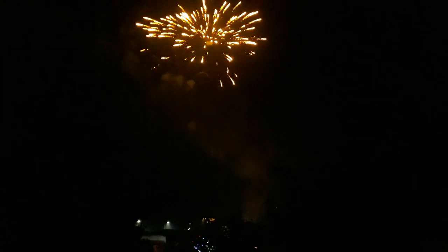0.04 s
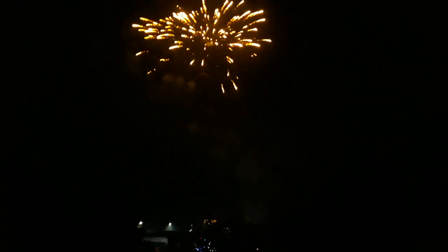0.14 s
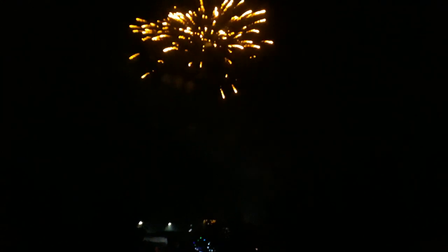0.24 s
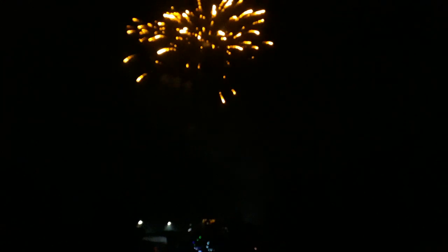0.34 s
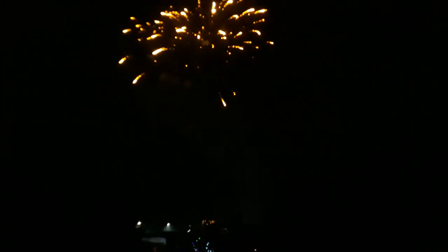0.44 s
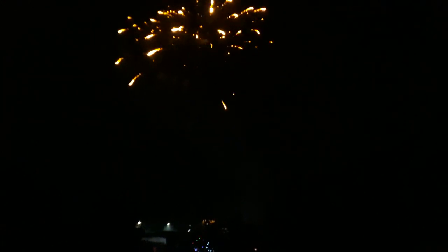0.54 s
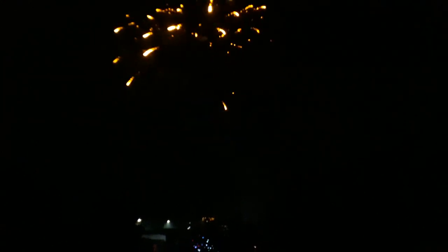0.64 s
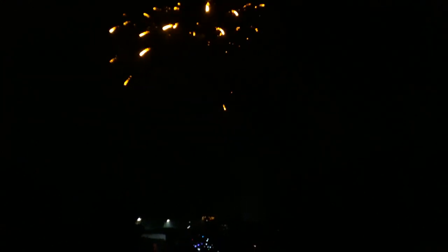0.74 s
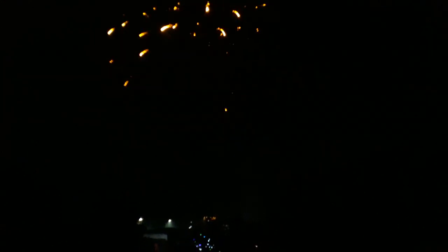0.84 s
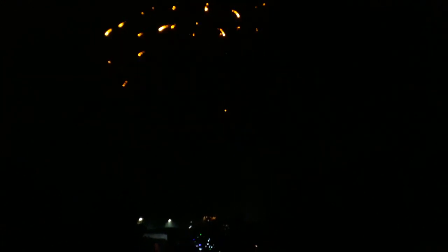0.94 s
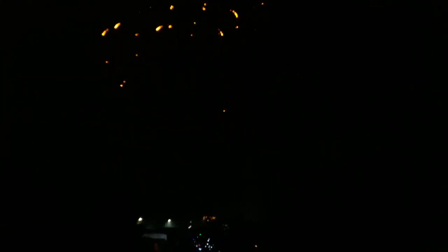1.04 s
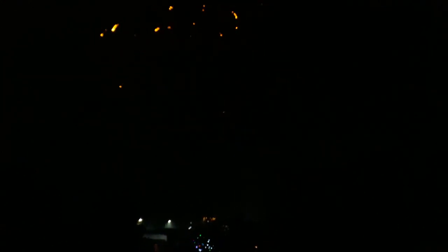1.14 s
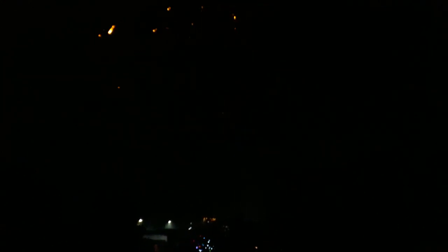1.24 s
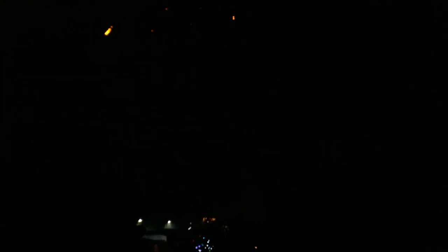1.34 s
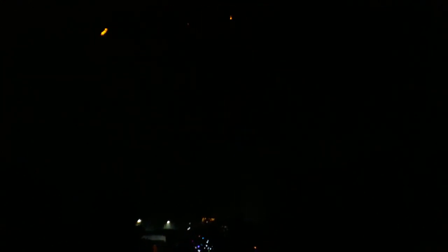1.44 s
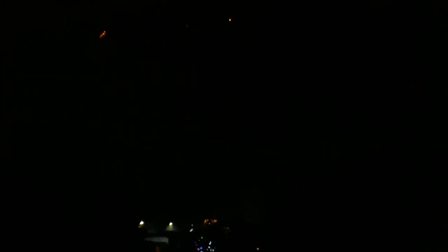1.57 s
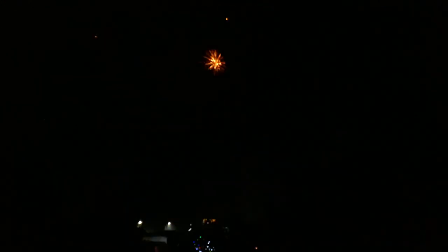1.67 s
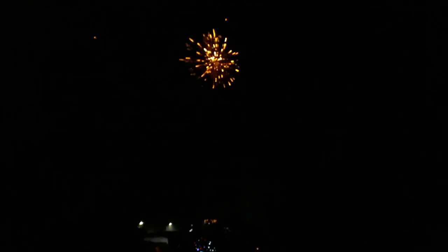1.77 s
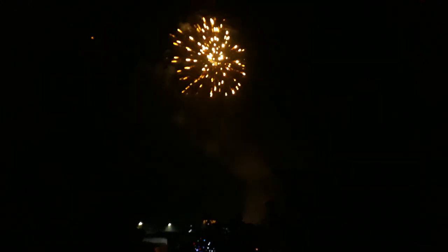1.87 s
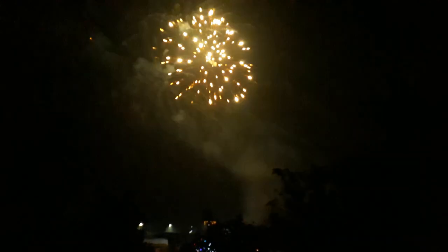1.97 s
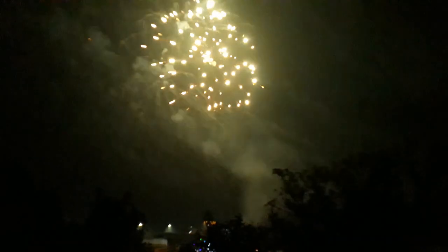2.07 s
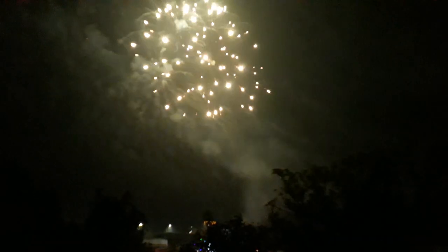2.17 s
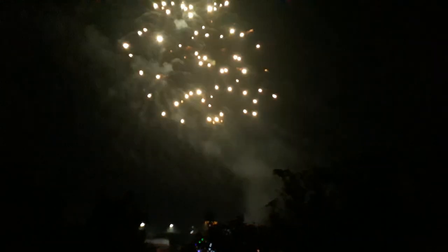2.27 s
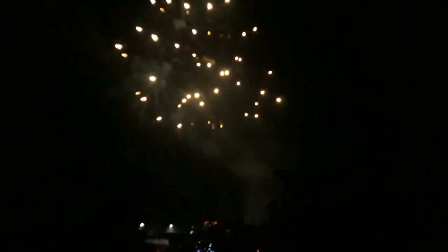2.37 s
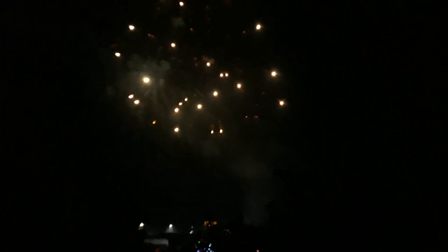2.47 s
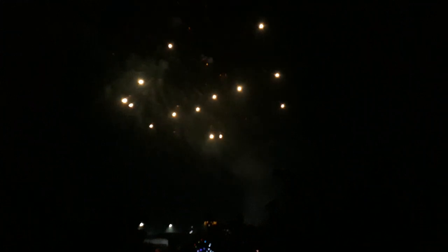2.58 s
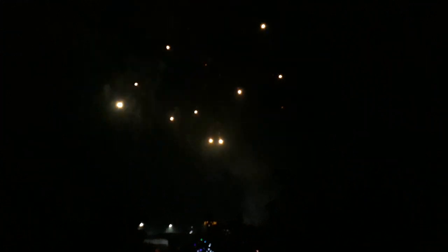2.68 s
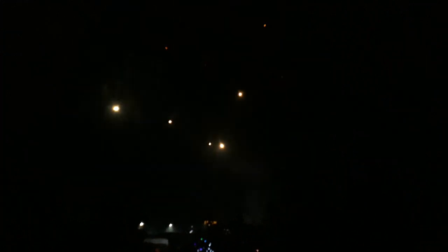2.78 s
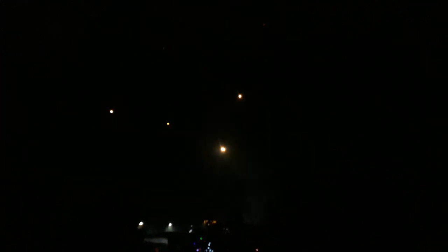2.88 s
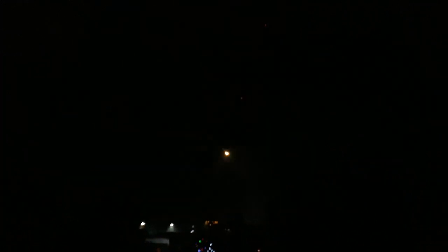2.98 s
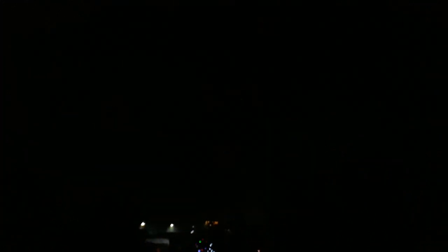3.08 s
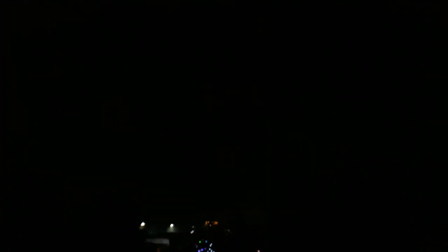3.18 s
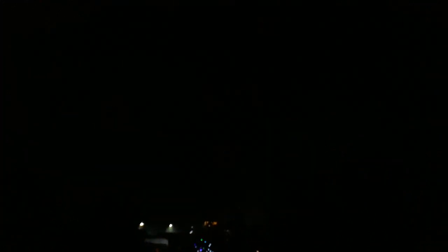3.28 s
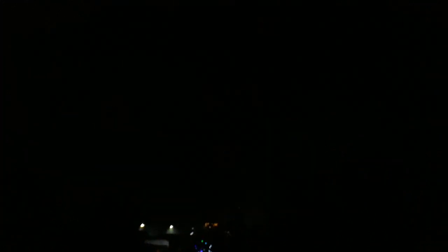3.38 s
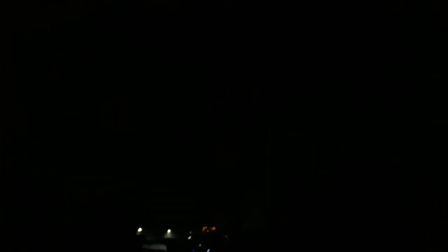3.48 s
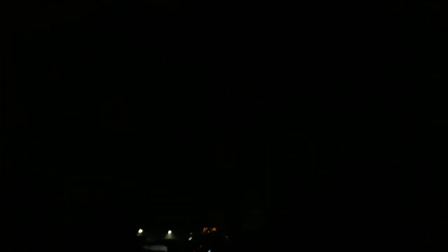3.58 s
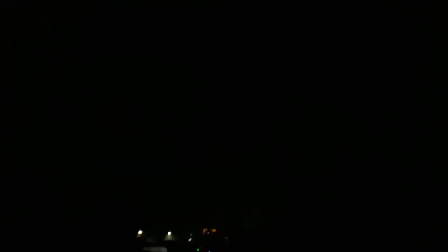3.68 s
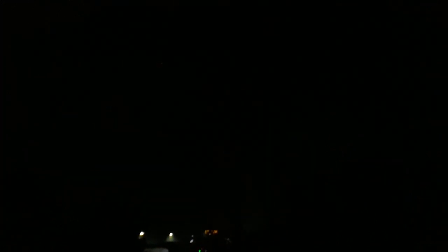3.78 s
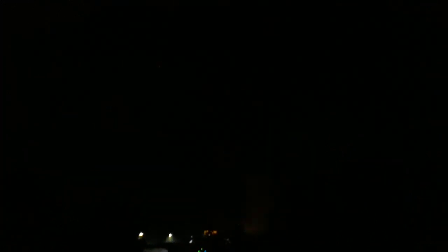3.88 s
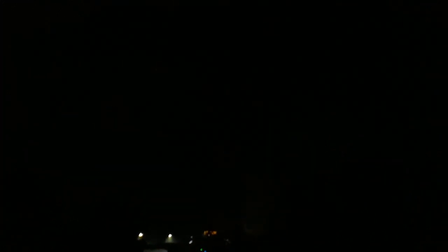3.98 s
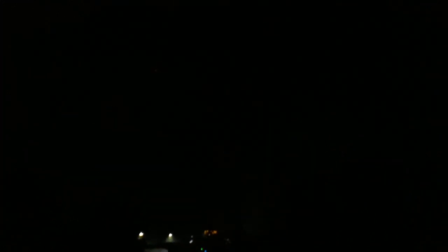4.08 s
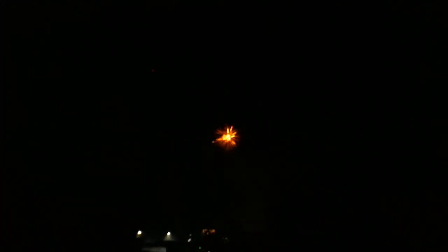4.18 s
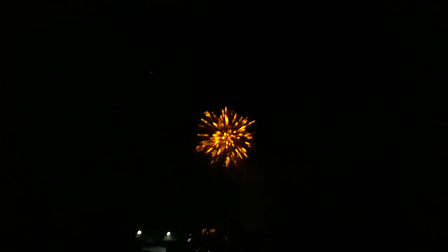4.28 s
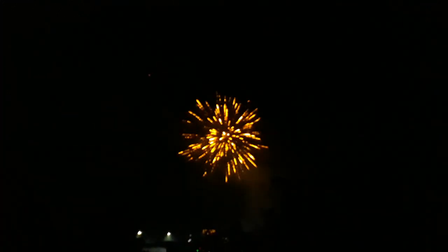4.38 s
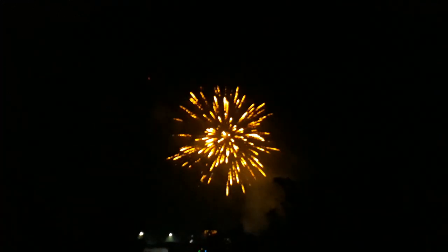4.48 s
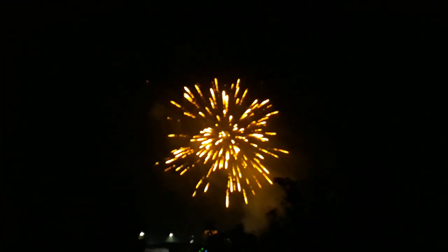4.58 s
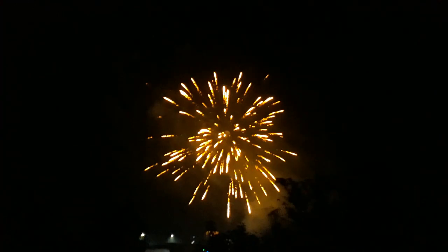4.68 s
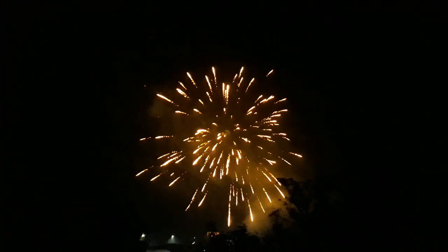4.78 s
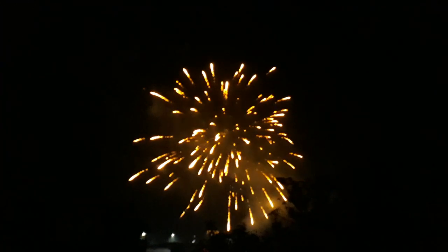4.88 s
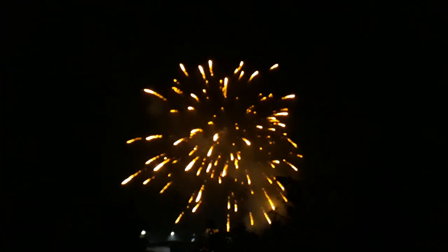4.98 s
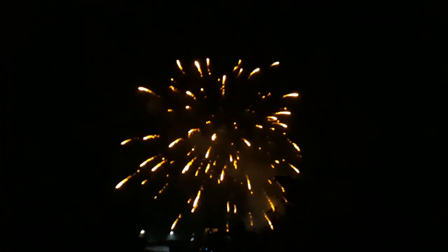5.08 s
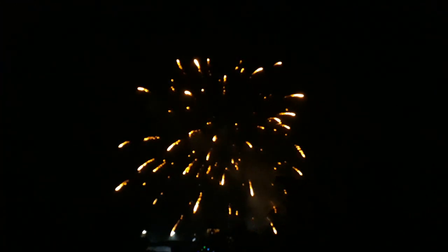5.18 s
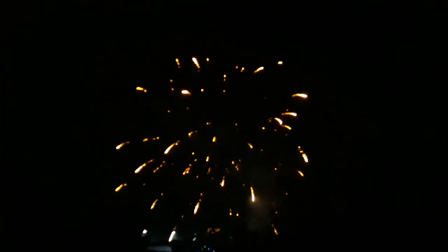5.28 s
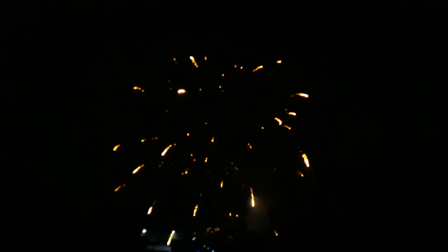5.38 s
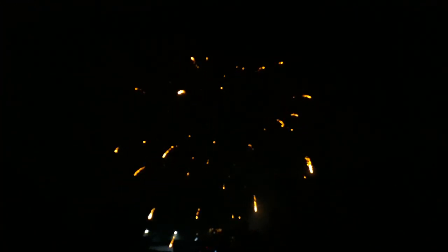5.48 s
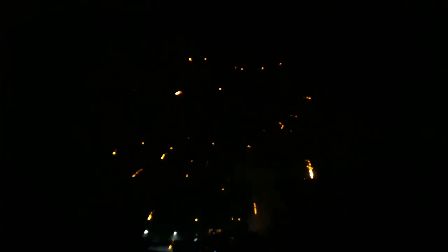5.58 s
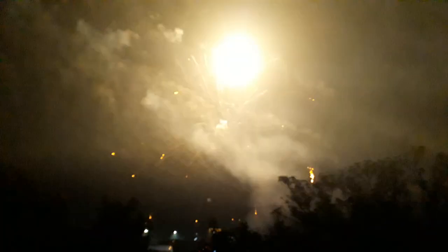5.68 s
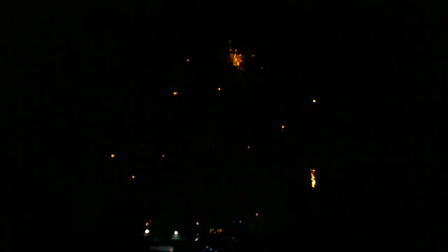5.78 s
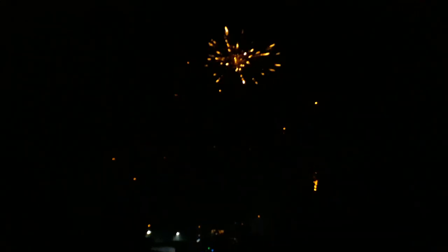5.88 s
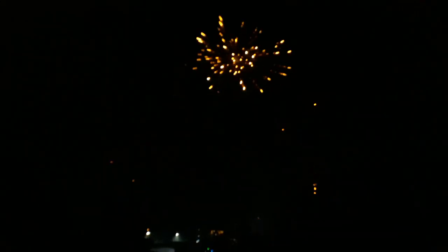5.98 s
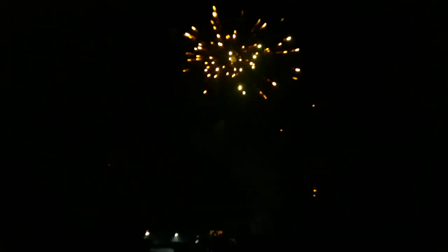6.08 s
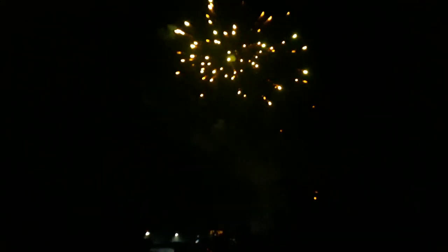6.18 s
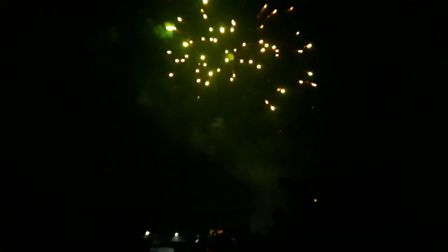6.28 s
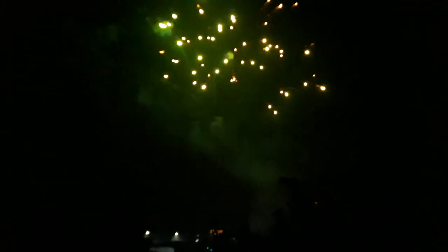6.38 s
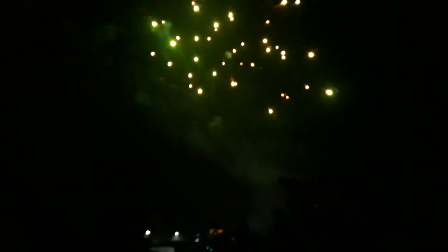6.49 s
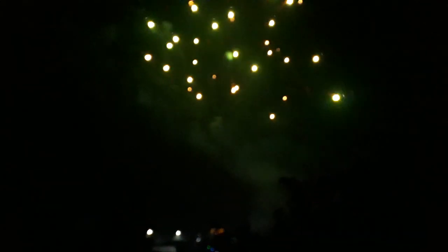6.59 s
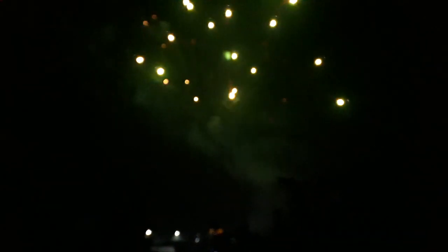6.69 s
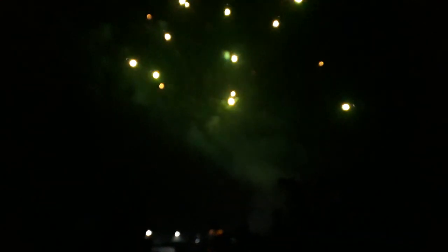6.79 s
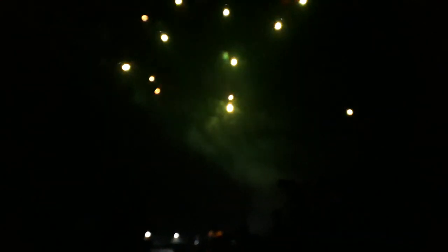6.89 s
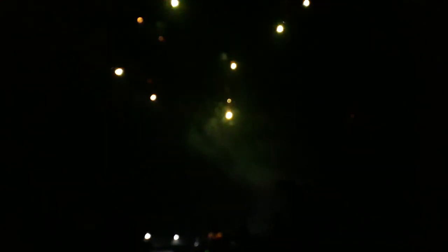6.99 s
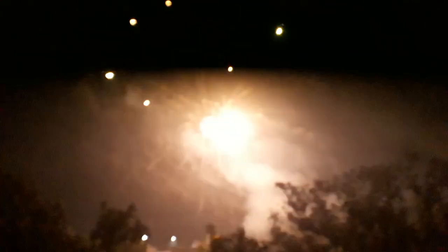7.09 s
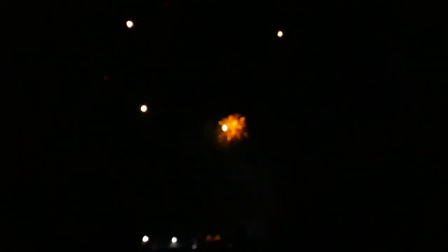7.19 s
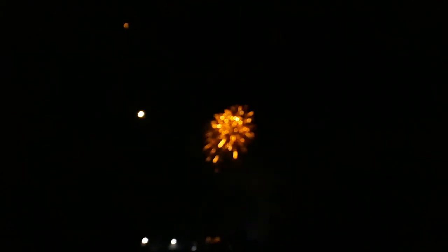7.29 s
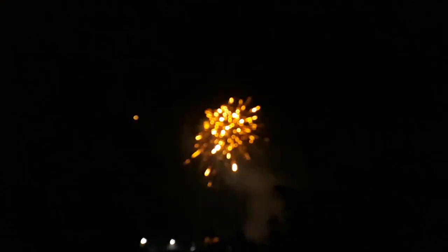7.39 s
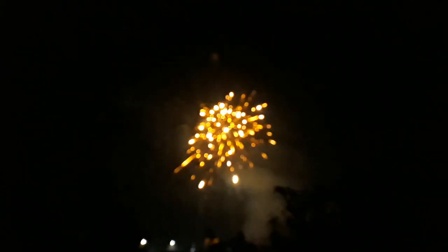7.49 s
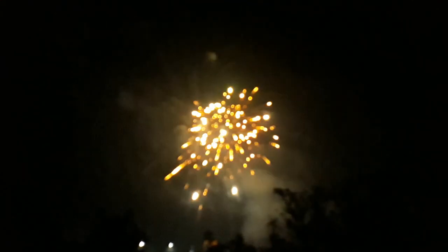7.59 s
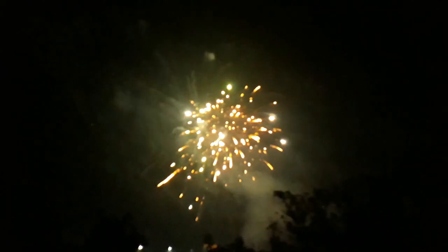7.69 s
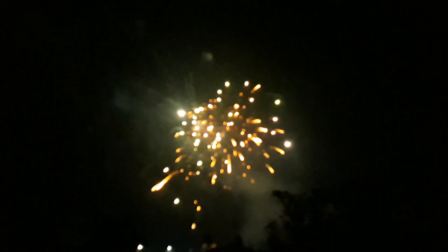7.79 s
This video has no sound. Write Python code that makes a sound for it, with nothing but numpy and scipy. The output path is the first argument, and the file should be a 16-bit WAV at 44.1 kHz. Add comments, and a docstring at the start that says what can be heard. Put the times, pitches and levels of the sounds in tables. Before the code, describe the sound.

Fireworks go off in a wooded valley at night, heard through one small microphone over a faint, steady hush. The opening holds only a very faint launch thump and the echo of an earlier burst, swelling at about 0.5 seconds. Sharp cracks that overload the microphone come at about 1.8, 4.4, 5.9 and 7.3 seconds. Each rattles briefly off nearby walls and trees, and almost a second later the hillside returns a long hissing roll that dulls as it fades, with hollow knocks from far walls. Shells leave their tubes with a thump and pop, softly at 2.9 seconds and more strongly at 4.1 and 5.8, with very faint thin hisses nearby. Burning stars fizz and crackle softly from about 6.3 to 6.8 seconds, with a small sharp tick at 6.4. The last bang rings away through the nearby trees.

```python
"""Fireworks in a wooded valley

A fireworks cake (a box of tubes) fires shell after shell at night, heard through one small microphone.
Each shell leaves its tube with a thump and bursts with a crack that overloads the microphone. Nearby
yards and trees scatter the crack; almost a second later the hillside returns it as a long hissing roll,
with slaps from far walls. Faint fizzes, hisses and ticks sound over the hush of the night."""
import sys
import numpy as np
from scipy import signal
from scipy.fft import rfft, irfft, next_fast_len
from scipy.io import wavfile

SR = 44100
rng = np.random.default_rng(int(sys.argv[2]) if len(sys.argv) > 2 else 0)


def pcm_store(signal):
    """Save signal as 16-bit PCM."""
    levels = np.round(np.clip(np.atleast_2d(signal), -1, 1) * 32767)
    wavfile.write(sys.argv[1], SR, levels.astype(np.int16).T)


N = 345303


def shells(rip_db=8.0, rip_lag_s=.0008, fence_lag_s=.072):
    """Each shell bursts: the crack arrives directly, then from things nearby, then from far away."""
    # the bursts; the first is before the start, so only its echoes are heard
    # (time [s], blast [dB], push length [ms], ground bounce delay [ms], thud [dB], near echoes [dB],
    #  far echoes [dB], fence [dB], extra far delay [ms], latest slap or valley delay allowed [s])
    bursts = [(-.328, 9, .6, 3.5, -10, -2.5, -0.5, -10, -1.5, 2),
              (1.8455, 22.5, 0.53, 3.38, -4.5, -2.5, -1, -11, 2, 2),
              (4.3541, 23.5, 0.57, 2.9, -11, -1.5, -0.9, -6.5, 16, 2),
              (5.9005, 20, 0.67, 3.57, -1, -3.5, 0.06, -11, 12, 1.45),
              (7.3123, 22.5, 0.5, 2.97, -23, 0, 2, -5, 9, 2)]
    # house fronts and sheds close by: (delay [ms], level [dB], treble limit [Hz])
    near_walls = [(7.67, 5, 2000), (18.44, 5, 860), (20, 3.5, 4900), (28.87, -1, 1600), (36.8, -7, 990),
                  (40.25, -0.5, 4200), (45.4, -4.5, 2700), (64.8, -3, 1300), (120.2, 0.5, 460)]
    out = np.zeros(N)
    for s, blast_db, push_ms, bounce_ms, thud_db, near_db, far_db, fence_db, far_ms, reach_s in bursts:
        shock = blast(push_ms, bounce_ms, bounce=0.58, low_hz=131)
        add(out, s, amp(blast_db) * shock)
        add(out, s, amp(thud_db) * thud())
        # the casing tears, heard directly and again off the ground
        tear = amp(rip_db) * rip(.0009, low_hz=600, top_hz=8260)
        add(out, s, tear)
        add(out, s + bounce_ms / 1000 + rip_lag_s, .7 * tear)
        for lag_ms, db, top_hz in near_walls:
            add(out, s + lag_ms / 1000, amp(near_db + db) * cut(shock, top_hz, "low"))
        add(out, s, amp(near_db) * yards())
        add(out, s + fence_lag_s, amp(fence_db) * fence())
        for echo in (treeline(), hillside(), slaps(reach_s), valley(reach_s)):
            add(out, s + far_ms / 1000, amp(far_db) * echo)
    return out


def blast(push_ms, bounce_ms, bounce, low_hz):
    """A sudden push of air and a longer pull, then the same off the ground; the deepest bass is lost."""
    ms = clock(.06) * 1000
    wave = lambda u: (u >= 0) * (1 - u) * np.exp(-np.abs(u))
    direct = wave(ms / push_ms)
    off_ground = bounce * wave((ms - bounce_ms) / push_ms)
    return cut(direct + off_ground, low_hz, "high", order=3)


def thud(hz=55, decay_s=0.004):
    """The ball of hot gas swells too far and falls back: one slow swing of pressure."""
    t = clock(.08)
    return np.sin(2 * np.pi * hz * t) * np.exp(-t / decay_s)


def rip(decay_s, low_hz, top_hz):
    """A ragged spray of small shocks that dies at once."""
    t = clock(0.043)
    spray = cut(rng.standard_normal(len(t)), low_hz, "high")
    spray = cut(spray, top_hz, "low", order=3)
    return spray / np.std(spray) * np.exp(-t / decay_s)


def launches(pop_db=-7, tail_db=-30, tail_fall_db_per_s=37, loss_db_per_khz=2.5):
    """A charge lifts the shell from its tube with a thump and a pop; things around it scatter the sound."""
    # the charges: (time [s], thump [dB], echoes [dB], extra treble loss [dB per kHz])
    charges = [(.214, -33, -9.5, 2.5), (2.861, -24, -10, 5), (4.0960, -11, 1, 0), (5.7650, -4, 4.5, 2)]
    # clumps of echoes from around the tubes: (delay [s], level [dB])
    returns = [(0, -39), (0.067, -25.5), (.17, -31)]
    # tone of those echoes: (pitch [Hz], level [dB])
    colour = [(24, -53), (40, -27.5), (163, -5.5), (329, -3.5), (422, -18), (479, -7), (751, -17.5),
              (2320, -12), (4340, -22), (7930, -21), (16000, -60)]
    out, t = np.zeros(N), clock(.5)
    clumps = sum(amp(db) * swell(t, lag_s, rise_db_per_s=700, hold_s=0, fall_db_per_s=268)
                 for lag_s, db in returns)
    gain = np.hypot(clumps, amp(tail_db - tail_fall_db_per_s * t))
    for s, thump_db, echo_db, dull_db in charges:
        top_hz = 3000 / (0.5 + 2 * abs(dull_db))
        thump = cut(blast(push_ms=1.45, bounce_ms=8.0, bounce=0.33, low_hz=100), top_hz, "low", order=4)
        pop = cut(rip(0.0023, low_hz=120, top_hz=4000), top_hz, "low", order=4)
        echoes = scatter(gain, loss_db_per_khz + dull_db, colour, spread_db=4, patchy_db=2.0)
        add(out, s, amp(thump_db) * thump)
        add(out, s, amp(thump_db + pop_db) * cut(pop, 100, "high"))
        add(out, s, amp(echo_db) * echoes)
    return out


def yards(yard_fall_db_per_s=116.5, tree_fall_db_per_s=32):
    """Hard surfaces nearby scatter the crack in a fast rattle; trees behind ring on. Both grow duller."""
    # tone of the nearby echoes: (pitch [Hz], level [dB])
    colour = [(24, -55.5), (40, -47), (124, -9.5), (194, -5), (585, -5.5), (896, -12.5), (990, -11.5),
              (1590, -8.5), (2000, -13), (2260, -7), (5720, -22), (8340, -18), (10700, -31), (13400, -25),
              (16000, -28.5)]
    t = clock(1)
    rattle = scatter(amp(-4.5 - yard_fall_db_per_s * t), loss_db_per_khz=0.42 + 4.2 * t, colour=colour,
                     spread_db=4, patchy_db=2.0, clicks=9.8, click_top_hz=7000)
    trees = scatter(amp(-22 - tree_fall_db_per_s * t), loss_db_per_khz=0.5 + t, colour=colour,
                    spread_db=3.5, patchy_db=0.6, clicks=3.07)
    return rattle + cut(trees, 10200, "low", order=5)


def fence(rib_hz=2650, rasp=0.84, uneven=0.12, width_s=.0023):
    """The uneven ribs of a fence return the crack one after another: a very short, falling zip."""
    t = clock(0.0202)
    from_middle = t - t.mean()
    spacing = np.interp(t, np.linspace(0, t[-1], 20), rng.standard_normal(20))
    hz = rib_hz * (1 - 12 * from_middle + uneven * spacing)
    ribs = np.sin(2 * np.pi * np.cumsum(hz) / SR)
    grit = cut(rng.standard_normal(len(t)), 6800, "low", order=4)
    return (ribs + rasp * grit) * np.exp(-(from_middle / width_s) ** 2)


def treeline(lag_s=.72):
    """Leaves at the edge of the wood give the first far echo, a short bright hiss."""
    # tone of the leaves' echo: (pitch [Hz], level [dB])
    colour = [(40, -50), (150, -9.5), (400, 2), (1000, -7), (2400, -1.5), (5000, -14.5), (8000, -21.5),
              (10700, -43), (16000, -53)]
    gain = amp(-35.5) * swell(clock(1.6), lag_s, rise_db_per_s=110, hold_s=0.22, fall_db_per_s=50)
    return scatter(gain, 0, colour, spread_db=4, patchy_db=-0.1, clicks=3.7)


def hillside(lag_s=.9, fade_s=.6):
    """The wooded slope returns a long roll, with small cracks from its rock faces."""
    # tone of the roll: (pitch [Hz], level [dB])
    colour = [(24, -72), (40, -57), (63, -22), (130, -9), (276, -2), (455, -0.5), (918, -9.5), (1120, -7.5),
              (2050, -10.5), (2380, -7.5), (5440, -27), (7170, -31.5), (8130, -35), (10700, -54),
              (16000, -58)]
    # bare rock faces: (delay [s], level [dB], treble limit [Hz])
    rocks = [(.88, -21.5, 2580), (.901, -24, 2600), (1.072, -27, 2400), (1.1, -21.5, 2590),
             (1.122, -26, 2600), (1.765, -31, 2600), (1.951, -31.5, 3170), (2.091, -37, 3600)]
    t = clock(3)
    gain = amp(-24) * swell(t, lag_s, rise_db_per_s=99.5, hold_s=0.23, fall_db_per_s=12.5)
    fade = np.clip((t[-1] - t) / fade_s, 0, 1)
    loss_db_per_khz = 0.02 + 2 * np.clip(t - lag_s, 0, 1.05)  # the longer the path, the duller
    out = scatter(gain * fade, loss_db_per_khz, colour, spread_db=4.5, patchy_db=0.87, clicks=6.9)
    for s, db, top_hz in rocks:
        crack = rip(0.009, low_hz=600, top_hz=top_hz)
        add(out, s, amp(db) * cut(crack, top_hz * np.sqrt(2), "low", order=4))
    return out


def slaps(reach_s):
    """Far walls return the blast worn down to a swing or two: a hollow knock with a small snap."""
    # the walls: (delay [s], level [dB], pitch [Hz], length [ms], snap [dB], snap's treble limit [Hz])
    far_walls = [(1.3309, -7.5, 436, 1, -11.5, 1290), (1.556, -8, 400, 0.97, -13, 1050),
                 (1.5707, -12, 538, 1.6, -3.5, 2800)]
    out, t = np.zeros(N), clock(0.027)
    from_middle = t - t.mean()
    for lag_s, db, hz, length_ms, snap_db, snap_hz in far_walls:
        bump = 1 / np.cosh(from_middle * 1000 / length_ms)
        noise = cut(rng.standard_normal(len(t)), 600, "high")
        snap = bump * cut(noise, snap_hz, "low", order=6)
        knock = bump * np.sin(2 * np.pi * hz * from_middle)
        slap = cut(knock + amp(snap_db) * snap / np.abs(snap).max(), 140, "high")
        if lag_s < reach_s:
            add(out, lag_s - t.mean(), amp(db) * slap)
    return out


def valley(reach_s, lag_s=1.61, fade_s=.8):
    """The far side of the valley answers last with a dull, hollow roll; silent if out of reach."""
    # tone of this roll: (pitch [Hz], level [dB])
    colour = [(40, -48), (130, -13.5), (300, -4), (480, -1), (740, -1.5), (900, -9), (1500, -10),
              (2400, -11.5), (3500, -18.5), (5200, -39), (16000, -69)]
    t = clock(3.2)
    gain = amp(-33.5) * swell(t, lag_s, rise_db_per_s=39.5, hold_s=0, fall_db_per_s=11)
    fade = np.clip((t[-1] - t) / fade_s, 0, 1) ** 2
    return (lag_s < reach_s) * scatter(gain * fade, 0, colour, spread_db=5, patchy_db=1.5, clicks=5.7)


def star_fizz(lead_s=.5):
    """The stars, a firework's glowing pellets, fizz and crackle as they burn."""
    # the fizzes: (time [s], level [dB], hold [s], treble boost [dB per kHz])
    fizzes = [(6.289, -32.5, 0.11, 1), (6.5, -40.5, 0.29, 0.84)]
    # tone of the fizz: (pitch [Hz], level [dB])
    colour = [(300, -35), (800, -2.5), (1300, 5), (1750, 1.5), (2400, -2.5), (4500, -14.5), (8000, -26.5),
              (11000, -56), (16000, -56)]
    out, t = np.zeros(N), clock(1)
    for s, db, hold_s, boost in fizzes:
        gain = amp(db) * swell(t, lead_s, rise_db_per_s=153, hold_s=hold_s, fall_db_per_s=215)
        add(out, s - lead_s, scatter(gain, -boost, colour, spread_db=5.5, patchy_db=0.5, clicks=7.6))
    return out


def thin_hiss():
    """Thin high hisses, probably the fuse burning on between tubes."""
    # the hisses: (time [s], level [dB], fall [dB per s])
    hisses = [(3.565, -58.5, 55), (4.096, -54, 20), (5.765, -53, 25)]
    # tone of the hiss: (pitch [Hz], level [dB])
    colour = [(1000, -21), (6000, 6), (9000, 1), (11500, -11), (16000, -14)]
    out, t = np.zeros(N), clock(.5)
    for s, db, fall_db_per_s in hisses:
        add(out, s, scatter(amp(db - fall_db_per_s * t), 0, colour, spread_db=2, patchy_db=3.5))
    return out


def dry_ticks(decay_s=0.0025):
    """A few small sharp ticks, each a tiny puff of noise."""
    # the ticks: (time [s], peak level [dB], pitch [Hz])
    ticks = [(4.271, -31, 4500), (6.372, -17, 2380), (7.144, -29.5, 4500)]
    out, t = np.zeros(N), clock(.03)
    for s, db, hz in ticks:
        puff = rng.standard_normal(len(t)) * np.exp(-t / decay_s)
        tick = cut(cut(puff, hz / 2, "high"), hz * np.sqrt(2), "low", order=5)
        add(out, s, amp(db) * tick / np.abs(tick).max())
    return out


def night(level_db=-47.5):
    """The faint, steady hush of the night."""
    # tone of the hush: (pitch [Hz], level [dB])
    colour = [(30, -24.5), (150, -9), (400, 4.5), (1000, 2), (2500, -4.5), (5000, -17), (10000, -40),
              (16000, -29.5)]
    return amp(level_db) * tint(rng.standard_normal(N), colour)


def scatter(gain, loss_db_per_khz, colour, spread_db, patchy_db, clicks=0, click_top_hz=3500):
    """Countless tiny sounds of unequal strength arrive in patches; the air can take away their treble."""
    size = next_fast_len(len(gain), True)
    t = np.arange(size) / SR
    arrivals = rng.standard_normal(size) * amp(spread_db * np.clip(rng.standard_normal(size), -3, 3))
    # about a hundred clicks a second stand out: in an echo, trunks or rocks among the leaves
    spikes = (rng.random(size) < 100 / SR) * rng.standard_normal(size)
    standouts = clicks * cut(spikes, click_top_hz, "low", order=3)
    patch_times = np.arange(0, t[-1], .008)
    patches = amp(patchy_db * np.interp(t, patch_times, rng.standard_normal(len(patch_times))))
    spectrum = rfft(tint((arrivals / np.std(arrivals) + standouts) * patches, colour))
    # split into overlapping pitch bands, so that each has its own loss
    khz = np.linspace(0, SR / 2000, len(spectrum))
    bands_khz = [0, 1, 2, 3.5, 5.5, 8, 14]
    out = np.zeros(len(gain))
    for centre_khz, pick in zip(bands_khz, np.eye(len(bands_khz))):
        band = irfft(spectrum * np.interp(khz, bands_khz, pick), size)[:len(gain)]
        out += band * amp(-loss_db_per_khz * centre_khz)
    return gain * out


def tint(x, colour):
    """Shape a sound's tone with (pitch [Hz], level [dB]) points; its average strength (rms) becomes 1."""
    hz, db = np.transpose(colour)
    f = np.linspace(0, SR / 2, len(x) // 2 + 1) + 1
    curve = amp(np.interp(np.log(f), np.log(hz), db))
    bass_cut = f / np.hypot(f, hz[0])
    y = irfft(rfft(x) * curve * bass_cut, len(x))
    return y / np.std(y)


def swell(t, peak_s, rise_db_per_s, hold_s, fall_db_per_s):
    """A volume curve that rises to 1 at peak_s, holds and falls away."""
    rise_db = rise_db_per_s * np.maximum(peak_s - t, 0)
    fall_db = fall_db_per_s * np.maximum(t - peak_s - hold_s, 0)
    return amp(-rise_db - fall_db)


def cut(x, hz, kind, order=2):
    """Keep what lies below ("low") or above ("high") a pitch; a higher order cuts more sharply."""
    return signal.sosfilt(signal.butter(order, min(hz, SR * .45), kind, fs=SR, output="sos"), x)


def amp(db):
    """Turn decibels into a number to multiply by."""
    return 10 ** (np.asarray(db) / 20)


def add(out, s, sound):
    """Mix a sound in at s seconds; what lies outside the scene is dropped."""
    i = int(round(s * SR))
    part = sound[max(-i, 0):max(N - i, 0)]
    out[max(i, 0):max(i, 0) + len(part)] += part


def clock(seconds):
    """The time of each sample in a short sound."""
    return np.arange(int(seconds * SR)) / SR


def scene():
    """The fireworks and their echoes over the hush of the night, in one channel."""
    return (shells() + launches() + star_fizz() + thin_hiss() + dry_ticks() + night())[None]


def record(dry, ceiling=1.0, top_hz=15950):
    """The microphone's opening colours the sound, the blasts overload it and the highest treble is cut."""
    # resonances of the opening, here slight dips: (pitch [Hz], width [Hz], level change [dB])
    resonances = [(2520, 1400, -0.5), (8200, 11100, -3)]
    for hz, width_hz, change_db in resonances:
        band = signal.lfilter(*signal.iirpeak(hz, hz / width_hz, fs=SR), dry)
        dry = dry + (amp(change_db) - 1) * band
    clipped = np.clip(dry, -ceiling, ceiling)
    sagged = cut(clipped, 15, "high", order=1)  # the flattened peaks sag a little
    return signal.sosfilt(signal.ellip(10, .2, 70, top_hz, fs=SR, output="sos"), sagged)


dry = scene()
out = record(dry)
pcm_store(out)
```